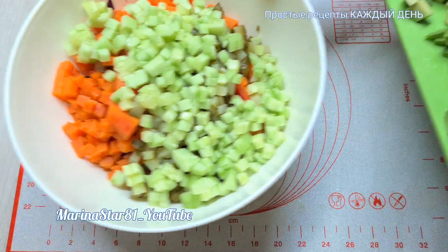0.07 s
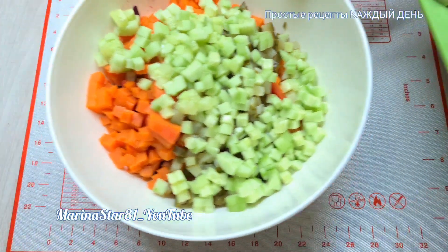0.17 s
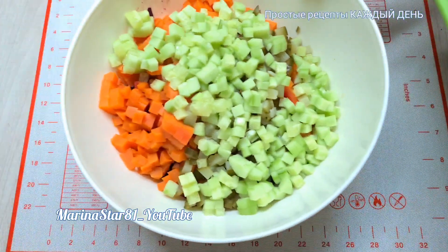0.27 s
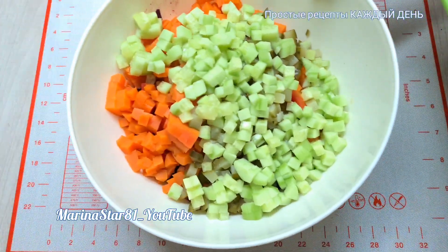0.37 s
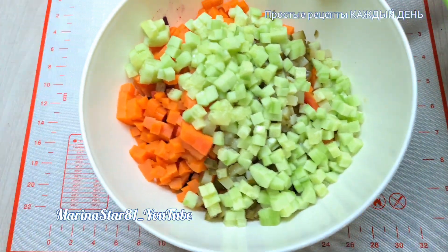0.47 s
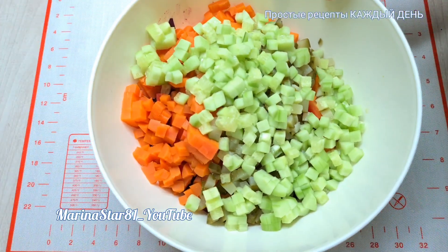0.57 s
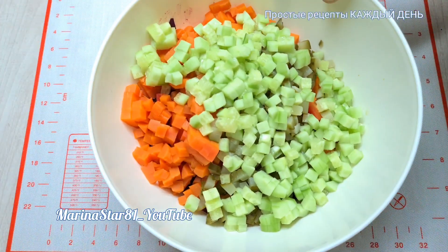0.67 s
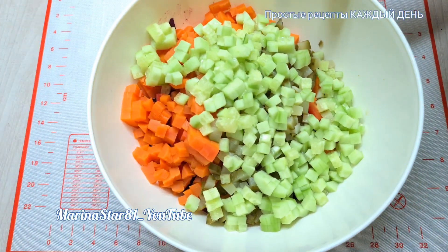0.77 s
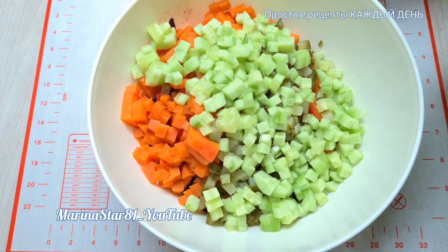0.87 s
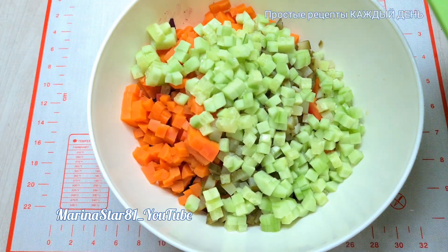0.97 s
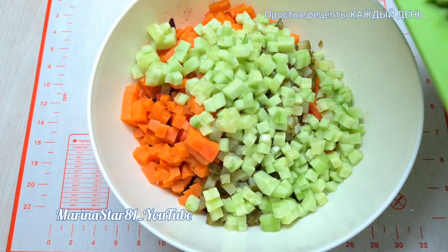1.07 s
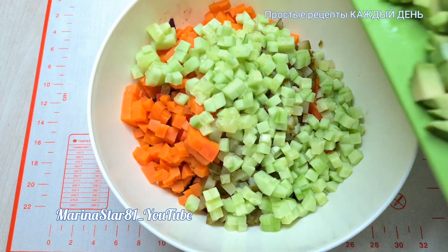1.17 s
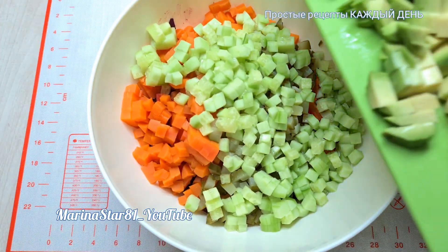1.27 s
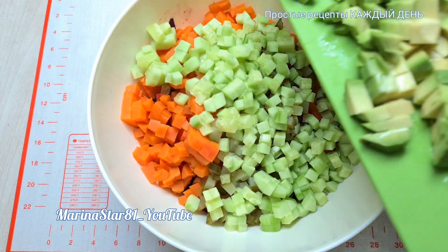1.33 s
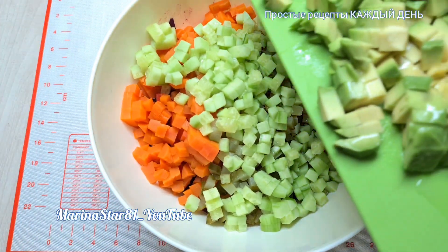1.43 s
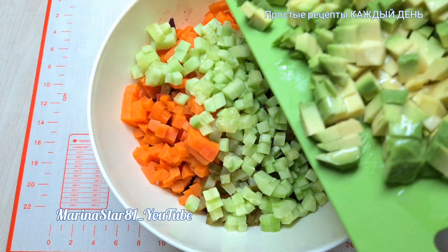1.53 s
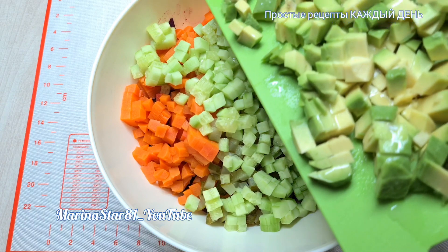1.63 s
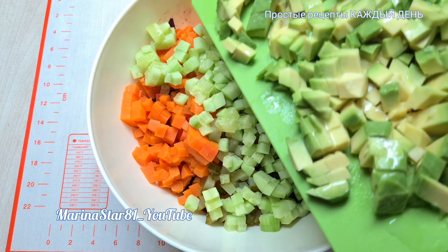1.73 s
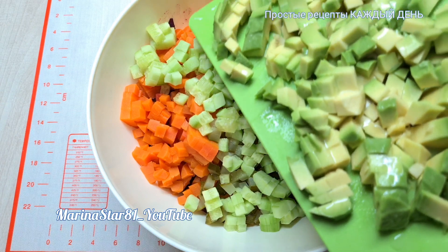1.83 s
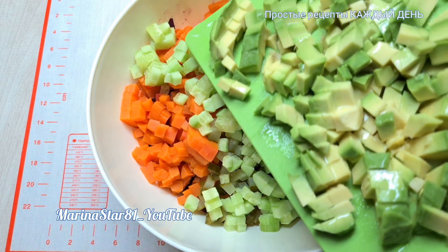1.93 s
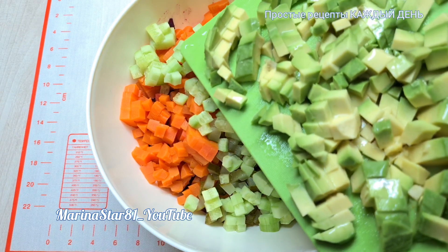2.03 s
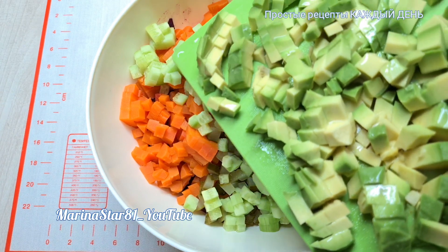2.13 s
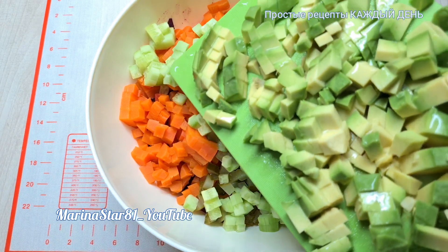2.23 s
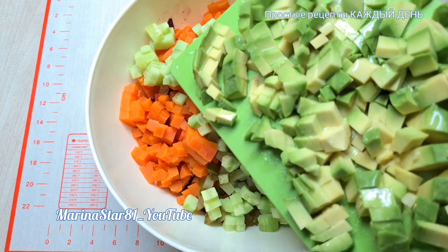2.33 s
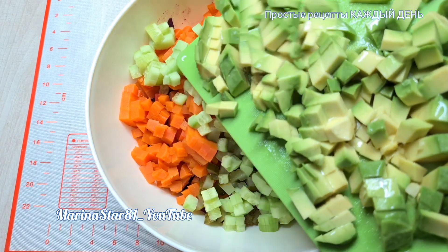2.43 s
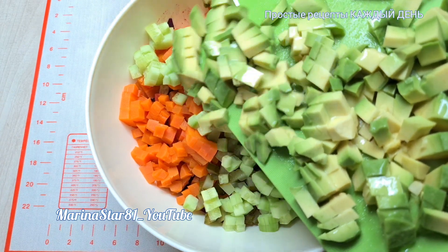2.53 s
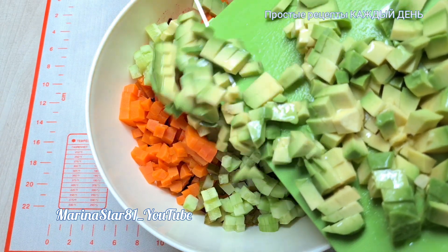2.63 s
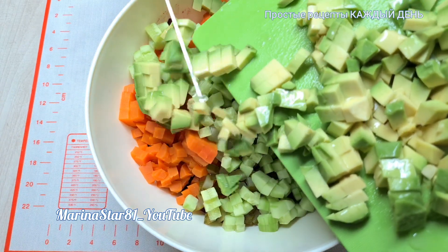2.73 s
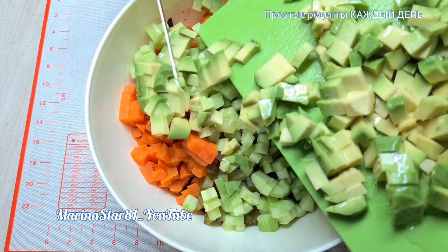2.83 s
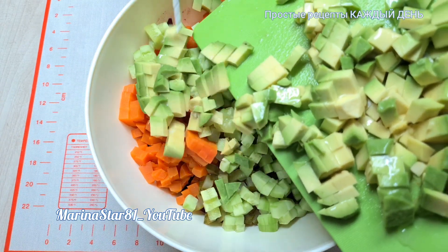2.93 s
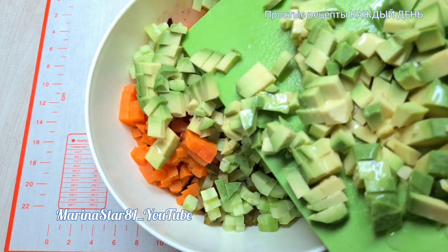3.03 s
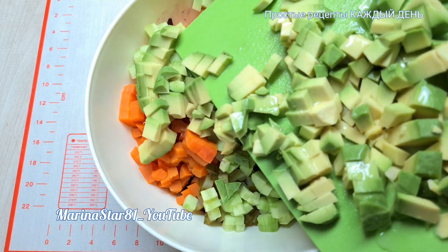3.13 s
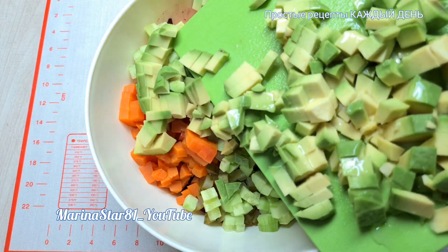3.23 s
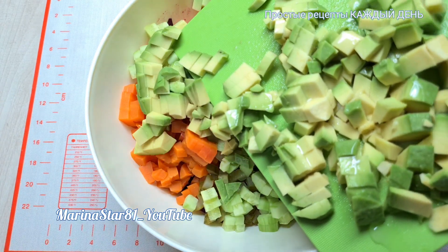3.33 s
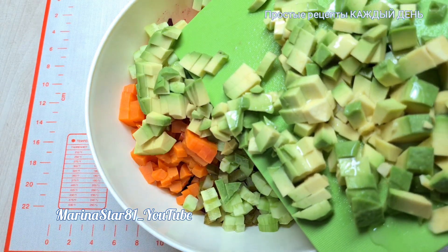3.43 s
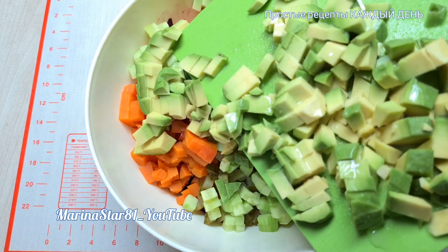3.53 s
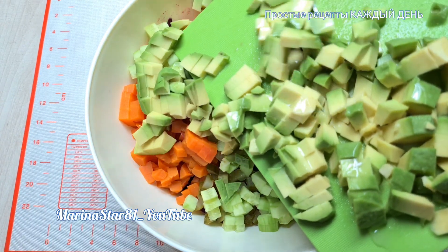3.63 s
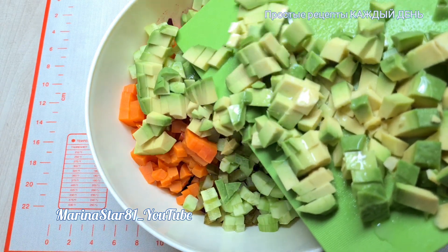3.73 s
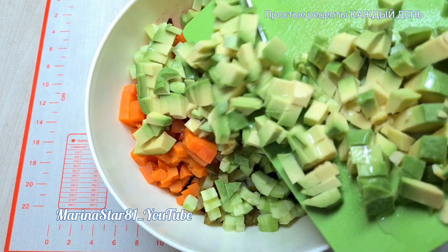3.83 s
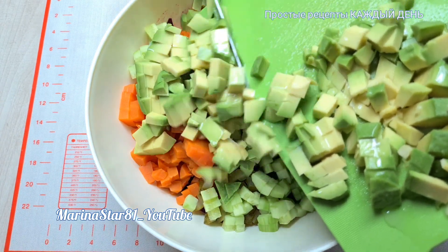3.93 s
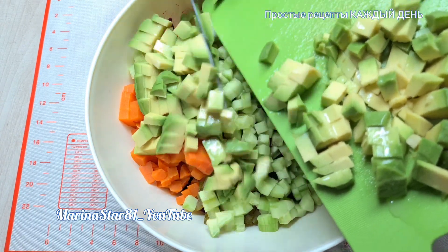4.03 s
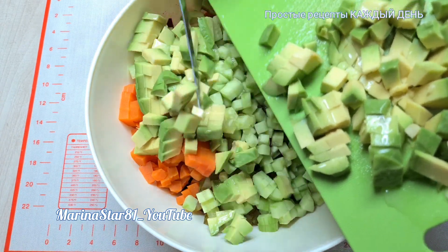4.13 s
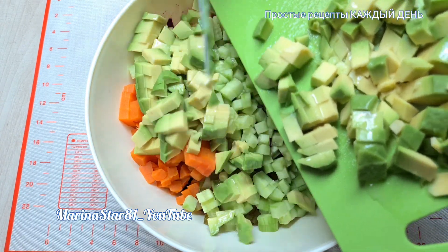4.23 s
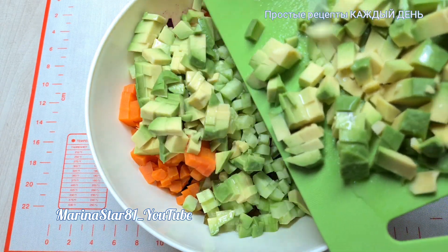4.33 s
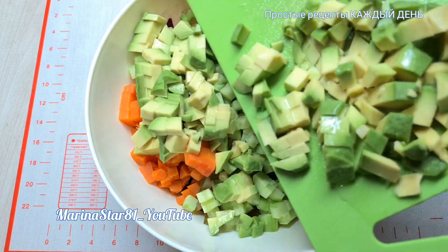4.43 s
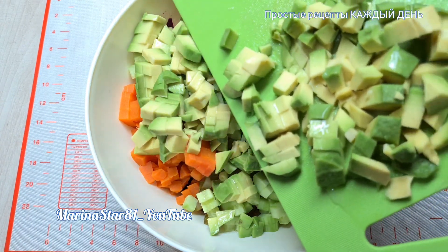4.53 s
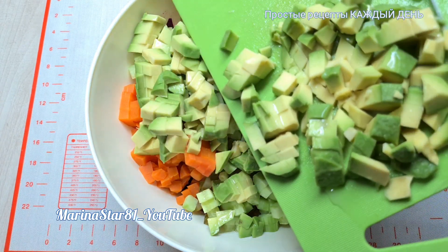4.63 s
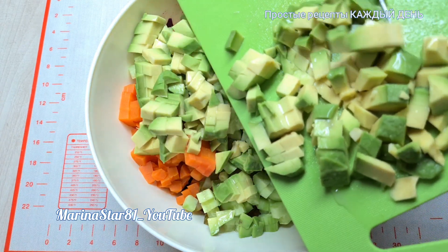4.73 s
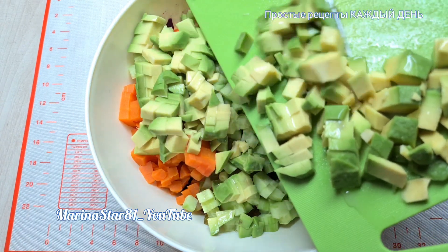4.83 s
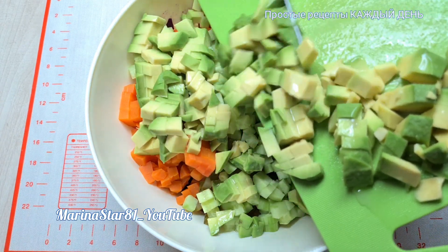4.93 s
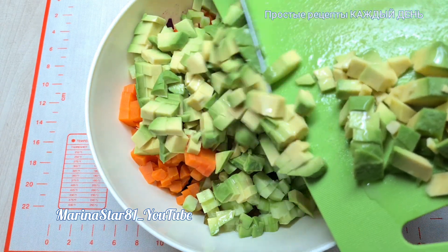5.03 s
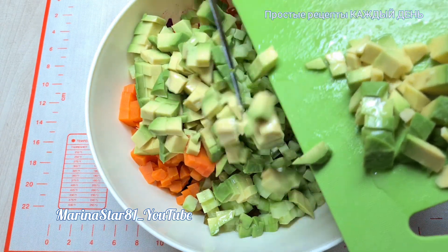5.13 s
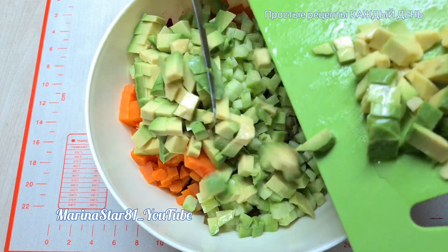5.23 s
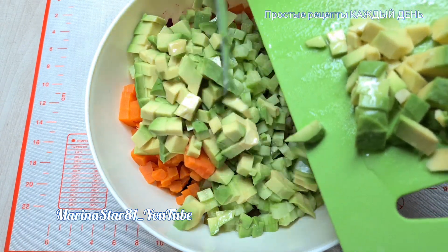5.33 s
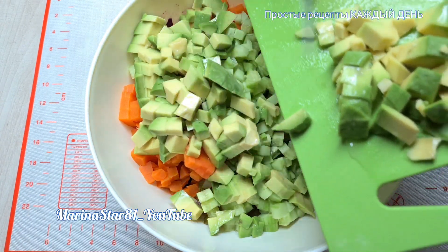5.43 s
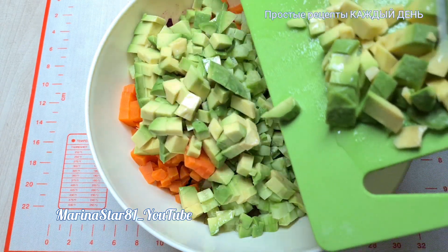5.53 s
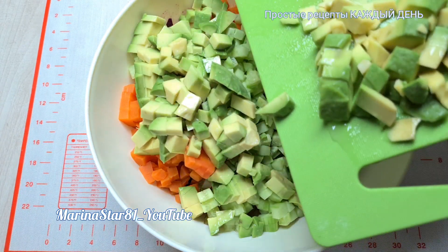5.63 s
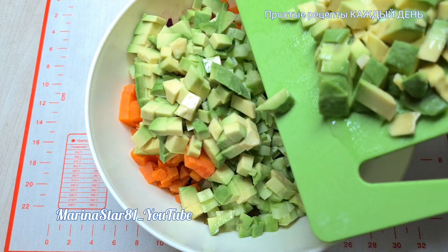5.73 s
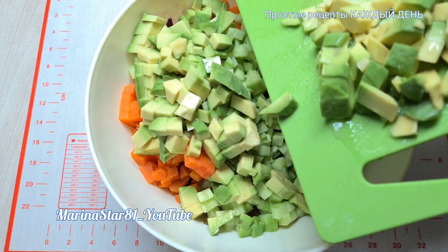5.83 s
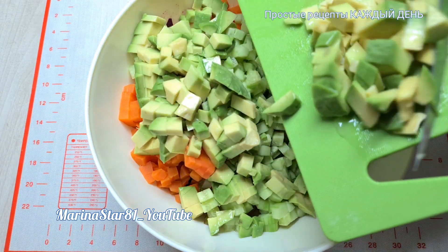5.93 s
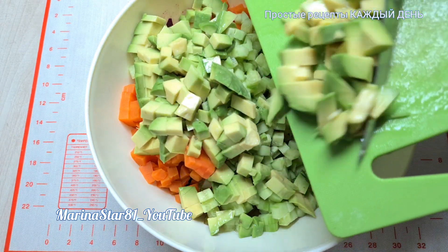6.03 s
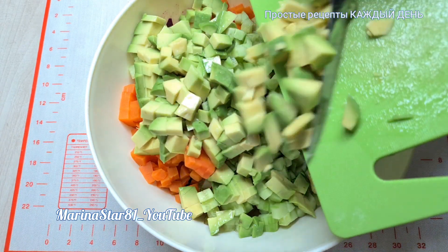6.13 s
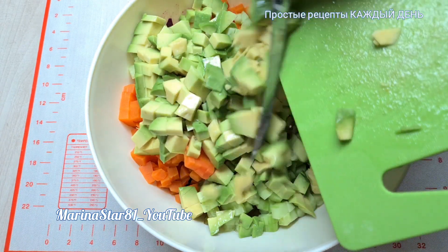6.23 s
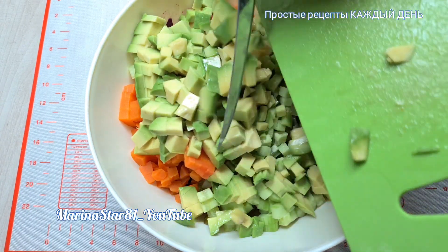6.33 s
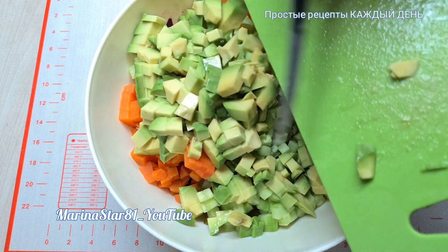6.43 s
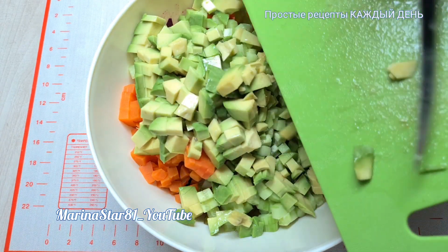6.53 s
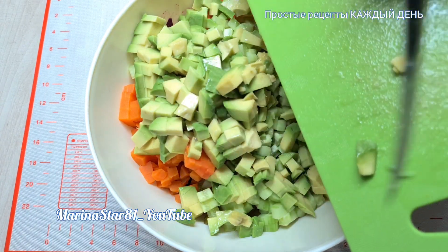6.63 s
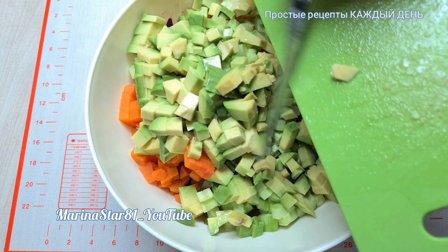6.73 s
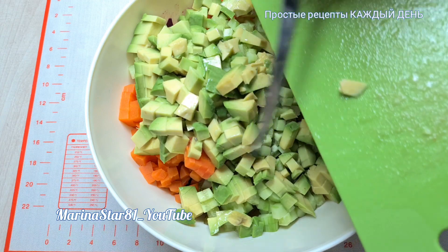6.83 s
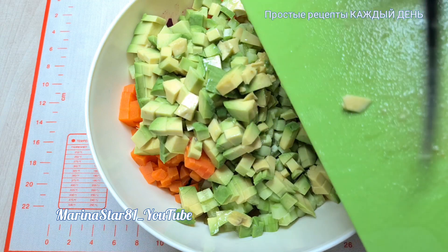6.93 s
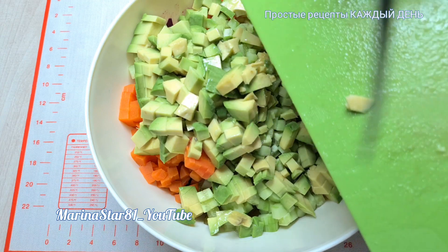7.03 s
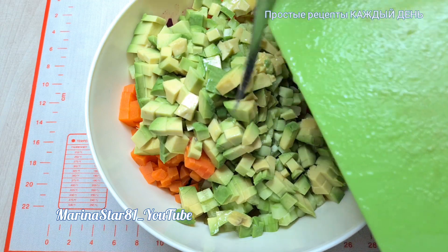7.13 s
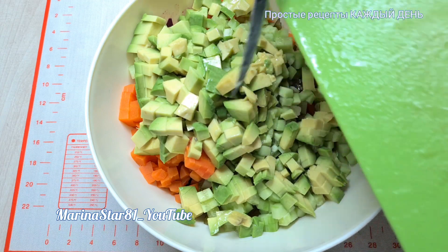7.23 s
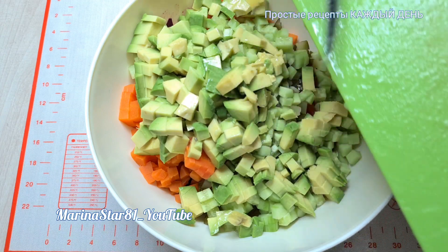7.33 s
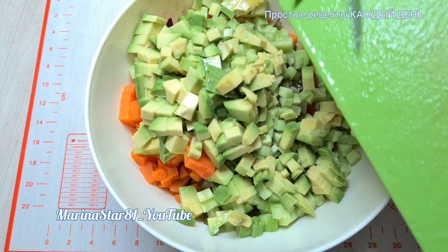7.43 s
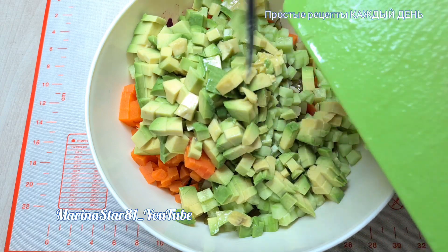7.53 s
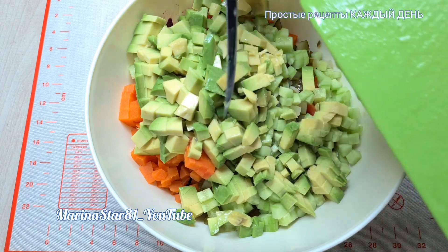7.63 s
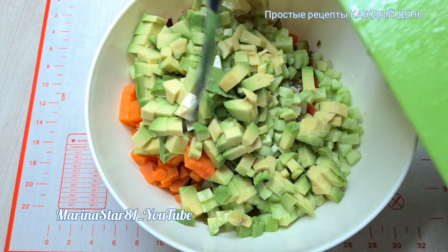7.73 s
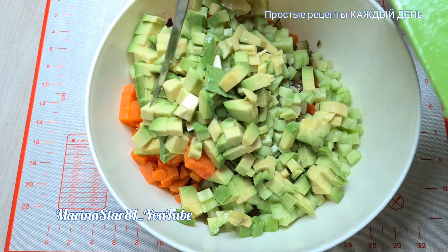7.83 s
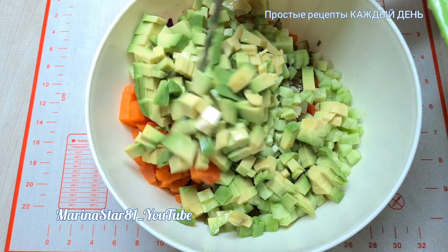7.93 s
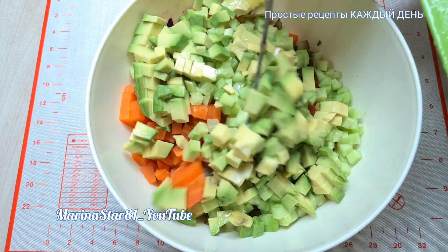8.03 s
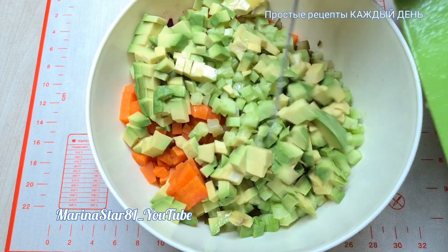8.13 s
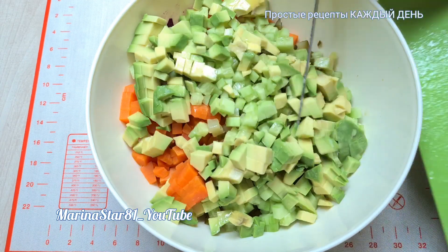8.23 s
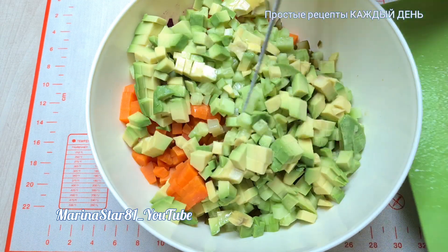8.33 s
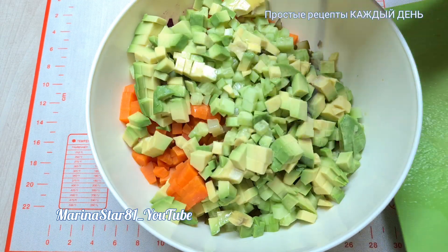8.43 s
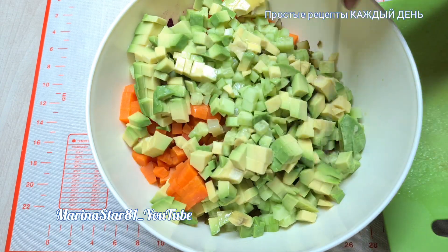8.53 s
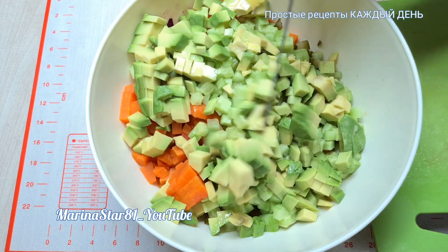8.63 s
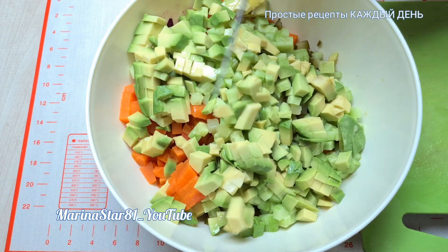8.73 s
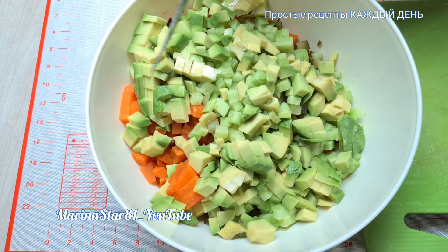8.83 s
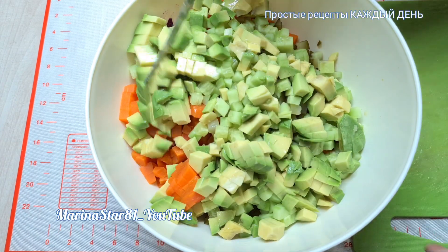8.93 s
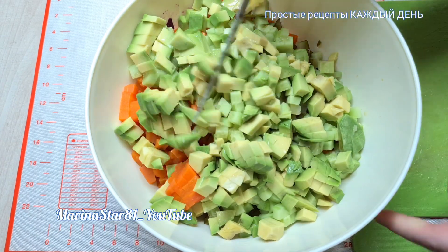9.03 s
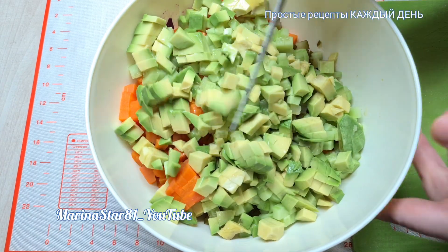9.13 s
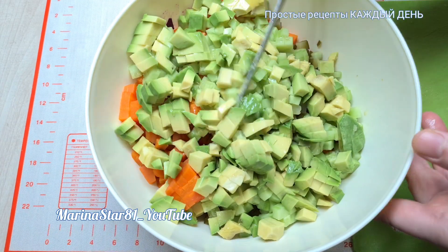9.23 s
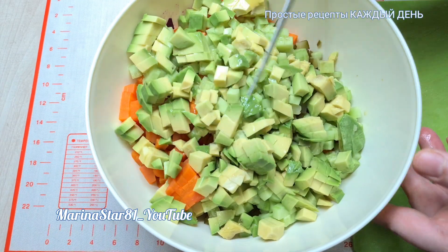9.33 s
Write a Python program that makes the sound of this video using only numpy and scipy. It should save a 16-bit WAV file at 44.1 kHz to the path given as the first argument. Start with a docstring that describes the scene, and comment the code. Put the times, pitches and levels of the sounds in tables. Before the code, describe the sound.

Close up in a small, fairly dry kitchen, a steel knife edge scrapes diced vegetables off a textured plastic cutting board. A faint scrape and light bumps come first, then a clack with a brief metallic ring. Irregular rattling strokes and knocks follow, growing louder and brighter past the middle, with three quick swipes that rise into a hiss. Finally the board settles on the table with dull knocks. A low room hum runs underneath.

```python
"""A kitchen knife scrapes diced vegetables off a hand-held textured plastic board into a bowl.
A small kitchen hums and hisses all along. Strokes come from the start: the edge rattles over bumps,
filtered noise gives its rasp, and tuned resonances let the board ring low and the steel sing high.
Knocks, short bursts into the same resonances, join at 0.5 s; the free blade sings near 1.4 s.
Near the end the board slides to rest on the table, with knocks that thud."""
import sys
import numpy as np
from scipy import signal
from scipy.fft import rfft, irfft, next_fast_len
from scipy.io import wavfile
from scipy.ndimage import uniform_filter1d

SR = 44100
rng = np.random.default_rng(int(sys.argv[2]) if len(sys.argv) > 2 else 0)


def master(y):
    """Save y as 16-bit WAV."""
    cut = np.clip(np.atleast_2d(y).T, -1, 1)
    pcm = np.round(cut * 32767)  # scale
    wavfile.write(sys.argv[1], SR, pcm.astype(np.int16))


N = 414099
T = np.arange(N) / SR
CLICK = np.eye(1, SR // 2)[0]  # a single click, then silence

# Room air, as a spectrum: pitch_hz, level_db (per Hz, relative)
AIR_COLOUR = [(25, -7), (50, 14), (100, 9.5), (160, 1), (270, 7), (450, -2.5), (900, -7), (1600, -5),
              (2500, -11.5), (5200, -34), (6200, -18.5), (7200, -37), (9000, -31.5), (15700, -37)]
# Peaks of the wavering hum: pitch_hz, width_hz, level_db (relative)
HUM_PEAKS = [(71.4, 18.3, 6), (140.6, 14, -5.5), (201, 34, -6), (269.1, 16.4, 1)]
# Loudness of the hum over time: time_s, level_db
HUM_LOUDNESS = [(0.0, -57), (0.29, -58), (3.43, -62.5), (8.63, -57.5), (8.92, -55), (9.39, -61)]
# Loudness of a faint hiss that comes and goes: time_s, level_db
HISS_LOUDNESS = [(0, -68), (.5, -78), (.9, -71.5), (1.57, -72.5), (1.6, -63.5), (1.64, -78.5), (4.2, -80),
                 (5.4, -76.5), (7.85, -77), (8.08, -65), (8.25, -74), (8.9, -69), (9.39, -81)]
# Spectrum of that hiss: pitch_hz, level_db (per Hz, relative)
HISS_COLOUR = [(1200, -27.5), (2000, -1.5), (4600, -11.5), (6500, -12.5), (11000, -24), (15000, -24.5)]
# Stereo width of the background: pitch_hz, side_minus_mid_db
AIR_SPREAD = [(60, -17), (240, -12.5), (950, 2.5), (3770, 0), (15000, -12)]
# How long kitchen echoes take to fall 60 dB: pitch_hz, decay_s
ECHO_DECAY = [(300, 0.28), (3000, 0.25), (12000, 0.16)]
# Stereo colour of the near sounds: pitch_hz, side_minus_mid_db
NEAR_SPREAD = [(120, -19), (300, -7.5), (600, -8), (1200, -3), (2400, -3), (4500, 1), (8000, -10),
               (15000, -4)]

# Resonances of each body: pitch_hz, level_db (relative), decay_s (time to fall 60 dB)
BOARD_MODES = [(415.3, 2.5, 0.077), (476, 4, 0.021), (623, 0.5, 0.018), (693, 0, 0.035), (721, 4.5, 0.018),
               (1051.7, -10.5, 0.16), (1184, 3, 0.019), (1445, 12, 0.0087), (1622, 3.5, 0.015),
               (1715, -14, 0.15), (1900, -3.5, 0.012)]
BLADE_MODES = [(2140, -8.5, 0.22), (2670, 7, 0.01), (2975, -6.5, 0.15), (3112, 19, 0.0049),
               (3397, 1, 0.022), (3854, 10, 0.0073), (4050, -14, 0.14), (4170, -13.5, 0.12),
               (4665, 7, 0.015), (4767, -17.5, 0.2)]
TABLE_MODES = [(82, -0.5, .14), (140, -3.5, 0.14), (196.8, -0.5, 0.027), (276, -12.5, 0.19)]
FREE_BLADE_MODES = [(3320, 7, .15), (3400, 18.5, 0.079), (3600, -2, 0.15), (4620, 11, 0.088),
                    (5975, 9, 0.085), (7700, -13, 0.24), (9030, -7, 0.078), (11000, -12, 0.068),
                    (12190, -13, .1), (12800, -16, 0.088), (14890, -22, 0.11)]
# Reach of deep board, upper board and blade, one row each: lowest_hz, highest_hz
BODY_BANDS = [(370, 945), (850, 2077), (2000, 6300)]
UPPER_HZ = 950  # board modes from here up answer to sharper contact
BODIES = [
    [mode for mode in BOARD_MODES if mode[0] < UPPER_HZ],
    [mode for mode in BOARD_MODES if mode[0] >= UPPER_HZ],
    BLADE_MODES,
]

# Spectra of the bare edge, its rasp and its top fizz: pitch_hz, level_db (per Hz, relative)
RASP_COLOUR = [(2710, -71), (4600, 1.5), (4860, -1.5), (5230, -14), (6220, 1), (6780, -6), (7580, -7),
               (8600, -25), (11200, -47.5), (18900, -120)]
FIZZ_COLOUR = [(5060, -47), (8600, -2.5), (11400, -4), (14500, -13), (16000, -3)]

# The free blade chatters as it is picked up: time_s, level_db
RATTLE_LOUDNESS = [(1.349, -37.5), (1.362, -33), (1.39, -53), (1.46, -60), (1.487, -54), (1.53, -62.5),
                   (1.56, -92)]

# Knocks: touch_s, deep_board_peak_db, then relative to it upper_board_db, blade_db and table_thud_db;
# last, favoured_upper_pitch_hz
KNOCK_EVENTS = [(0.544, -47.5, -1, -10.5, 1.5, 1950), (0.577, -53, -20, -28, 11.5, 2000),
                (1.353, -19, 1.5, 1, -17, 3000), (2.14, -25, 6, 6, -24, 4030),
                (2.28, -37, 8, 8.5, -36, 3200), (2.297, -36.5, 4.5, 10, -29.5, 3300),
                (2.306, -24, 8, 16, -34, 3330), (2.316, -35.5, -17, 8, -30, 3400),
                (2.327, -27, -8, 10, -37, 3600), (2.677, -18.5, -6.5, -16, -25, 2500),
                (3.454, -25.5, -8.5, -17.5, -26.5, 2500), (3.501, -22, -25, -14, -34, 2980),
                (4.353, -32.5, 10.5, -11, -19, 2030), (4.396, -28, -1, -20, -15, 2000),
                (4.574, -23.5, 2.5, 0, -22, 3000), (4.62, -37.5, -15, 12.5, -22, 3320),
                (5.376, -42, -3, -10.5, -10, 2530), (5.774, -24, -5, -10, -31, 2500),
                (5.853, -10, -1.5, -10, -21, 1990), (6.504, -33, -8.5, -40, -12, 1500),
                (6.992, -11.5, 3, -5.5, -28, 2700), (7.428, -14, 11, 8, -27, 3200),
                (8.077, -33, -9, -22, -10, 2500), (8.189, -44.5, 2, -5, -10, 2210),
                (8.225, -31, -20.5, -30, -23.5, 2000), (8.456, -34, 1.5, -27, -4, 1410),
                (8.566, -40, -1.5, -16, -4, 2000), (8.699, -27.5, 6.5, 4.5, -7.5, 2480),
                (8.747, -34, 8.5, 6, -6.5, 2400), (8.943, -22.5, 3.5, 3, 0.5, 2000)]
# Spread of what a blow favours in deep board, upper board and blade: width (as a log pitch ratio)
BLOW_SPREADS = [0.44, 0.99, 0.33]
BLOW_DEEP_HZ = 705  # what a blow favours in the deep board
BLOW_DAMP_DB = -70.5  # blows hold the blade down, so long rings lose: dB per s of decay time
# The bare edge ticks as the blade is struck: dB, dB per dB of blade, dB more on the table
TICK_DB, TICK_SLOPE, TICK_SEATED_DB = -20, 0.86, 15
TICK_DECAY_S = 0.014

# One curve a stroke, except that the stroke from 5.88 to 6.27 s takes two, as its pitch turns at 5.945 s;
# the last two are as the board slides to rest on the table:
# time_s, pressure_db (as deep board level), speed_db (as edge rasp over deep board)
STROKE_CURVES = [
    [(0, -52, -34), (.134, -45.5, -29.5), (.19, -45.5, -32), (.26, -72, -15)],
    [(1.285, -48, -43), (1.302, -35, -41), (1.345, -40, -22), (1.36, -32.5, -18), (1.437, -45, -20),
     (1.575, -60, -26)],
    [(2.155, -72, -15), (2.187, -44, -17), (2.23, -103, -14)],
    [(2.28, -53, -18), (2.297, -36, -16), (2.315, -28.5, -12), (2.365, -41, -15), (2.39, -33, -18),
     (2.426, -39, -22), (2.666, -39.5, -19), (2.7, -45, -25), (2.74, -92, -22.5)],
    [(3.46, -49.5, -29), (3.51, -36.5, -25), (3.604, -44, -14), (3.674, -44.5, -25), (3.7, -78, -22)],
    [(3.73, -45, -28), (3.77, -41.5, -27), (3.92, -32.5, -20), (4.0, -40.5, -24), (4.05, -90, -22)],
    [(4.585, -34.5, -27), (4.669, -43.5, -18.5), (4.79, -37.5, -30), (4.827, -39, -17), (4.9, -43, -25),
     (5.0, -39, -22), (5.061, -33, -19), (5.1, -34.5, -22), (5.16, -78, -22.5)],
    [(5.75, -46, -22), (5.78, -36.5, -17.5), (5.85, -42, -26)],
    [(5.88, -33.5, -28), (5.945, -40.5, -19)],
    [(5.945, -40, -19), (5.96, -32, -21), (5.99, -30, -21.5), (6.03, -35, -15), (6.13, -31, -18),
     (6.22, -28.5, -17.5), (6.245, -44, -16.5), (6.27, -83, -19)],
    [(6.617, -34.5, -37), (6.657, -26.5, -22), (6.695, -33.5, -10), (6.74, -40, 2), (6.77, -76, -1)],
    [(7.005, -43, -37.5), (7.02, -33.5, -27), (7.06, -32, -9.5), (7.1, -39.5, 5), (7.125, -47.5, 3.5),
     (7.15, -74, -1)],
    [(7.445, -40.5, -21), (7.49, -30.5, -9), (7.537, -38, 2), (7.56, -88, -1.5)],
    [(7.65, -64, -39), (7.675, -49, -47), (7.76, -64, -45)],
    [(8.71, -55, -10), (8.786, -57, -15), (8.82, -76, -16)],
    [(8.955, -59, -13.5), (9.01, -59, -17), (9.09, -68.5, -19.5)],
]
# How the edge meets the board, one row for each curve: deep_start_hz, deep_end_hz (favoured deep pitch),
# pressed_start_hz, pressed_end_hz (pitch of the pressed blade), upper_board_db, blade_db, fizz_over_rasp_db
STROKE_CONTACT = [(545, 545, 1180, 850, 1, -3, -9), (527, 648, 1220, 1035, -1.5, -1.5, -11),
                  (655, 650, 1450, 1340, 0, 2, -13.5), (676, 710, 1684, 1995, 3.5, 0.5, -12),
                  (688, 710, 1380, 1550, 1, -1, -10.5), (705, 660, 1120, 870, -1, -2, -14),
                  (543, 760, 1055, 1114, -1, -1, -8), (690, 570, 1460, 1630, -4.5, -1.5, -1),
                  (680, 750, 1000, 1400, -7, -1.5, -6), (532, 760, 1010, 1294, -7, 0.5, -2.5),
                  (622, 350, 710, 1480, -1.5, 2.5, -0.5), (540, 660, 980, 1930, 2, 1.5, -2),
                  (607, 423, 1256, 1950, -1, -4.5, -4), (405, 383, 1080, 1000, -11, 0, -7),
                  (704, 640, 1110, 1100, 3, 6, -5), (700, 700, 1800, 1920, 10.5, 8.5, -9)]
UPPER_DB, UPPER_SLOPE = 6, 0.54  # upper board over deep board: dB, dB per dB of speed
BLADE_DB, BLADE_SLOPE = 5.5, 0.87  # the same for the blade
# Slow strokes load the blade with food, so long rings lose: speed dB, dB per dB per s of decay time
FREE_DB, FREE_SLOPE = -2.5, 1
# Resonances that slide with the contact, deep then pressed blade: width_hz, level_db (relative)
GLIDE_SHAPES = [(70, -7), (110, -5.5)]
# Blade resonances when the pressed pitch is BEND_FROM_HZ: pitch_hz, width_hz, level_db (relative)
BEND_SHAPES = [(2960, 110, -12), (3640, 250, -11.5), (5050, 110, -16.5)]
BEND_FROM_HZ, BEND_SLOPE = 1300, 0.3  # they follow the pressed pitch only in part

LEAN_DB = -0.54  # half of left minus right
EDGE_HZ = 15720  # top of the recorder's range


def amp(db):
    """Turns decibels into a gain."""
    return 10 ** (np.asarray(db) / 20)


def evened(x):
    """Scales a sound to an average (rms) level of 1."""
    return x / np.sqrt(np.mean(x ** 2) + 1e-20)


def read(points, hz):
    """Reads a table between its points, along log frequency."""
    f, value = np.transpose(points)
    return np.interp(np.log(hz + 1), np.log(f + 1), value)


def colour(x, points):
    """Filters a sound to the spectrum in a table."""
    size = next_fast_len(x.shape[-1])
    gain = amp(read(points, np.fft.rfftfreq(size, 1 / SR)))
    return irfft(rfft(x, size) * gain, size)[..., :x.shape[-1]]


def slow(size, count):
    """Rows of smooth random drift, rms 1 overall; a larger size drifts more slowly."""
    x = rng.standard_normal((count, N // 16 + 1))
    x = uniform_filter1d(x, size, axis=1)
    x = uniform_filter1d(x, size, axis=1)
    return np.repeat(evened(x), 16, axis=1)[:, :N]


def background():
    """Mid and side of the room air, a wavering hum and a faint hiss, all shaped from noise."""
    noise = rng.standard_normal((3, 2, N))
    hz = np.fft.rfftfreq(N, 1 / SR)
    peaks = sum(amp(db) / (1 + ((hz - f) / (width / 2)) ** 2) for f, width, db in HUM_PEAKS)
    hum = irfft(rfft(noise[1]) * peaks, N)
    mix = amp(-60.5) * evened(colour(noise[0], AIR_COLOUR))
    mix += amp(np.interp(T, *np.transpose(HUM_LOUDNESS))) * evened(hum)
    mix += amp(np.interp(T, *np.transpose(HISS_LOUDNESS))) * evened(colour(noise[2], HISS_COLOUR))
    return np.array([mix[0], colour(mix[1], AIR_SPREAD)])


def kitchen(x):
    """Sparse reflections of random sign, each band dying at its own speed."""
    taps = np.zeros(SR // 2)
    at = np.arange(200, SR // 2 - 20, 20)
    taps[at + rng.integers(0, 20, len(at))] = rng.choice([-1., 1.], len(at))
    hz, t, bands = signal.stft(taps, SR, nperseg=256)
    fading = bands * amp(-60 * t / read(ECHO_DECAY, hz)[:, None])
    tail = signal.istft(fading, SR, nperseg=256)[1]
    return signal.oaconvolve(x, tail / np.linalg.norm(tail))[:N]


def ring(force, modes, band, grip=None):
    """A force shakes a body's resonances (two-pole filters); grip says how well it drives each one."""
    out = np.zeros(len(force))
    for k, (hz, db, decay_s) in enumerate(modes):
        r = amp(-60 / (decay_s * SR))  # what is left after one sample
        w = 2 * np.pi * hz / SR
        drive = force if grip is None else force * grip[k]
        out += amp(db) * np.sin(w) * signal.lfilter([1], [1, -2 * r * np.cos(w), r * r], drive)
    return signal.sosfilt(signal.butter(3, band, "bandpass", fs=SR, output="sos"), out)


def grit(points):
    """The bare edge's answer to one click, with energy 1."""
    answer = colour(np.roll(CLICK[:512], 64), points)
    return answer / np.linalg.norm(answer)


def bumps(per_s, spread_db):
    """Clicks of uneven size and spacing, rms 1 overall and evened for their rate."""
    pace = per_s * amp(2.2 * slow(size=6, count=1)[0])
    clicks = np.diff(np.floor(np.cumsum(pace) / SR), prepend=0)
    sizes = amp(spread_db * np.minimum(rng.standard_normal(N), 2))
    return evened(clicks * sizes / np.sqrt(per_s))


def rattle():
    """Loose chatter, a run of clicks, sets the free blade singing."""
    s, db = np.transpose(RATTLE_LOUDNESS)
    loudness = amp(np.interp(T, s, db, left=-200, right=-200))
    force = loudness * bumps(np.full(N, 1500.), spread_db=2.5)
    band = (2800, 16000)
    grip = amp(2.0 * slow(size=60, count=len(FREE_BLADE_MODES)))  # fingers shift along the steel
    singing = ring(force, FREE_BLADE_MODES, band, grip)
    return singing / np.linalg.norm(ring(CLICK, FREE_BLADE_MODES, band))


def knocks():
    """Each blow rings board and blade near its favoured pitch and thuds through to the table."""
    rings = [np.array([amp(BLOW_DAMP_DB * mode[2]) * ring(CLICK, [mode], band) for mode in modes])
             for modes, band in zip(BODIES, BODY_BANDS)]
    tick = grit(RASP_COLOUR) + grit(FIZZ_COLOUR)
    thud = ring(CLICK, TABLE_MODES, (45, 400))
    out = np.zeros(N + SR)
    chatter = rng.standard_normal((len(KNOCK_EVENTS), SR // 10))
    t = T[:SR // 10]
    for (s, deep_db, upper_db, blade_db, thud_db, hz), noise in zip(KNOCK_EVENTS, chatter):
        answers = []
        for modes, rung, at_hz, width in zip(BODIES, rings, [BLOW_DEEP_HZ, hz, hz], BLOW_SPREADS):
            share = 1 / (1 + (np.log(np.transpose(modes)[0] / at_hz) / width) ** 2)
            answers.append(share @ rung)
        answers = np.array(answers + [thud])
        # a board that meets the table chatters on it harder and longer
        seated = amp(min(thud_db, 0))
        blow = 0.55 * CLICK[:SR // 10]
        blow = blow + (0.029 + 0.05 * seated) * noise * amp(-60 * t / (0.036 + 0.1 * seated))
        levels_db = deep_db + np.array([0, upper_db, blade_db, thud_db])
        sound = signal.oaconvolve(amp(levels_db) / abs(answers).max(1) @ answers, blow)
        skid = signal.oaconvolve(tick, noise * amp(-60 * t / TICK_DECAY_S))
        tick_db = deep_db + TICK_DB + TICK_SLOPE * blade_db + TICK_SEATED_DB * seated
        sound[:len(skid)] += amp(tick_db) * skid / abs(skid).max()
        at = round((s + .0028) * SR)  # the blow peaks just after first touch
        out[at:at + len(sound)] += sound
    return out[:N]


def favour(modes, pitch_hz, width, wander_db):
    """Drive of each mode: strongest near a pitch, wandering as the contact crosses nodes and crests."""
    grip = amp(wander_db * slow(size=70, count=len(modes)))
    grip = grip / (1 + (np.log(np.transpose(modes)[0][:, None] / pitch_hz) / width) ** 2)
    return grip / np.sqrt((grip ** 2).mean(0))


def glide(force, hz, width_hz):
    """A steep resonance that follows a pitch curve; white noise of rms 1 leaves at rms 1."""
    turn = np.exp(2j * np.pi * np.cumsum(hz) / SR)
    r = np.exp(-np.pi * width_hz / SR)
    gain = np.sqrt(2 * (1 - r * r) ** 3 / (1 + r * r))
    # shift the pitch down to zero, smooth, then shift it back up
    return (turn * signal.lfilter([gain], [1, -2 * r, r * r], force / turn)).real


def scrape():
    """The edge jumps from bump to bump; the faster it slides, the more rasp and the denser the bumps."""
    gains = np.zeros((5, N))  # deep board, upper board, blade, rasp, fizz
    # resting values between strokes
    rasp_db, deep_hz, pressed_hz = np.full(N, -30.), np.full(N, 650.), np.full(N, 1200.)
    for rows, contact in zip(STROKE_CURVES, STROKE_CONTACT):
        start_hz, end_hz, from_hz, to_hz, upper_db, blade_db, fizz_db = contact
        s, deep_db, speed_db = np.transpose(rows)
        on = (T >= s[0]) & (T < s[-1])
        fade = signal.windows.tukey(on.sum(), min(0.0033 * SR / on.sum(), 1))
        over_deep_db = [
            0 * s,
            upper_db + UPPER_DB + UPPER_SLOPE * speed_db,
            blade_db + BLADE_DB + BLADE_SLOPE * speed_db,
            speed_db,
            speed_db + fizz_db,
        ]
        gains[:, on] = fade * amp([np.interp(T[on], s, deep_db + over) for over in over_deep_db])
        rasp_db[on] = np.interp(T[on], s, speed_db)
        deep_hz[on] = np.linspace(start_hz, end_hz, on.sum())
        pressed_hz[on] = np.linspace(from_hz, to_hz, on.sum())

    bumps_per_s = np.clip(330 * amp(.9 * (rasp_db + 20)), 280, 4000)
    jumps = bumps(bumps_per_s, spread_db=3.0)
    # clumps of food under the edge make the pressure flutter
    gains *= evened(amp(1.5 * slow(size=25, count=1)))
    gains[1:3] *= evened(amp(3.0 * slow(size=50, count=2)))
    # the contact also strays
    deep_hz, pressed_hz = [deep_hz, pressed_hz] * amp(.5 * slow(size=120, count=2))
    gains[3:] *= evened(amp(2.5 * slow(size=90, count=2)))
    smooth = np.array([[.15], [.12], [.45], [.8], [.95]])  # weight of fine, steady rubbing
    rubbing = rng.standard_normal((5, N))
    force = gains * (np.sqrt(1 - smooth ** 2) * jumps + smooth * rubbing)

    edge = [grit(RASP_COLOUR), grit(FIZZ_COLOUR)]
    out = signal.oaconvolve(force[3:], edge, axes=1)[:, :N].sum(0)
    speed = amp(0.15 * (rasp_db + 3.5))  # a faster edge favours higher modes
    # favoured pitch in Hz, its width as a log ratio, wander in dB
    pitches = [(deep_hz, .07, 1.5), (1350 * speed, .4, 4.0), (3200 * speed, .4, 2.5)]
    for k, (modes, band) in enumerate(zip(BODIES, BODY_BANDS)):
        decay_s = np.transpose(modes)[2][:, None]
        free = amp(FREE_SLOPE * decay_s * (rasp_db - FREE_DB))
        ringing = ring(force[k], modes, band, free * favour(modes, *pitches[k]))
        out += ringing / np.linalg.norm(ring(CLICK, modes, band))
    # the pressed-blade glide is driven by the upper-board force
    for drive, hz, (width_hz, db) in zip(force, [deep_hz, pressed_hz], GLIDE_SHAPES):
        out += amp(db) * glide(drive, hz, width_hz)
    for hz, width_hz, db in BEND_SHAPES:
        bent_hz = hz * (pressed_hz / BEND_FROM_HZ) ** BEND_SLOPE
        out += amp(db) * glide(force[2], bent_hz, width_hz)
    return out


def scene():
    """Near sounds reach the two microphones by short paths that differ and change as the hands move."""
    near = scrape() + knocks() + rattle()
    paths = rng.standard_normal((2, 600)) * amp(-60 * T[:600] / 0.0087)
    paths = paths / np.linalg.norm(paths[0])
    turn = 2.45 * slow(size=200, count=1)[0]  # drifting blend of the two paths, as an angle in radians
    apart = signal.oaconvolve(near * [np.cos(turn), np.sin(turn)], paths, axes=1)
    mid = near + amp(-12.0) * kitchen(near)
    side = apart.sum(0)[:N] + amp(-11.0) * kitchen(near)
    mid, side = np.array([mid, colour(side, NEAR_SPREAD)]) + background()
    return np.array([mid + side, mid - side]) * amp([[LEAN_DB], [-LEAN_DB]])


def record(dry):
    """The recorder's band limit: a steep filter removes the highest treble."""
    lowpass = signal.firwin(511, EDGE_HZ, window=("kaiser", 9), fs=SR)
    return signal.oaconvolve(dry, lowpass[None], "same")


dry = scene()
out = record(dry)
master(out)
```